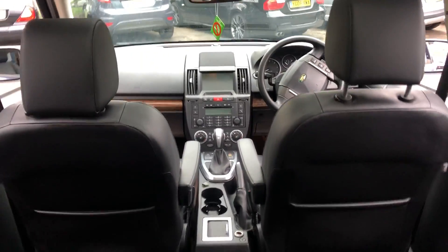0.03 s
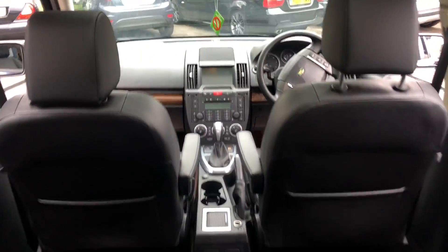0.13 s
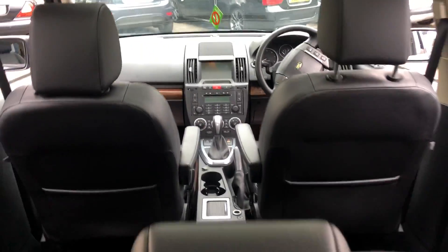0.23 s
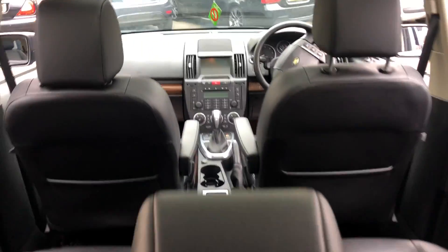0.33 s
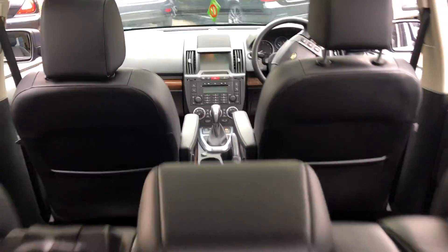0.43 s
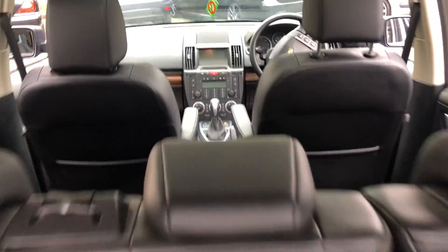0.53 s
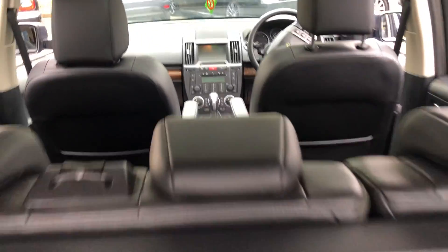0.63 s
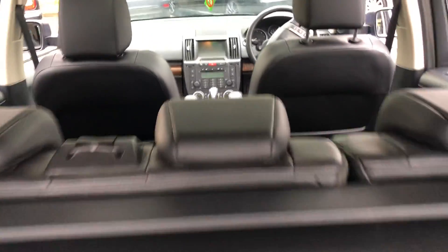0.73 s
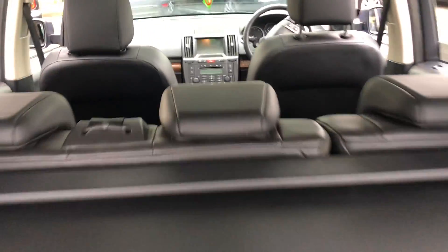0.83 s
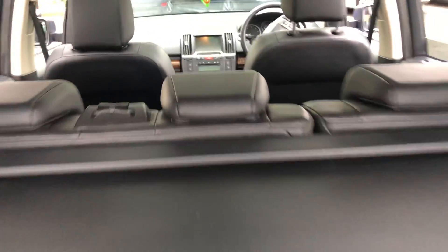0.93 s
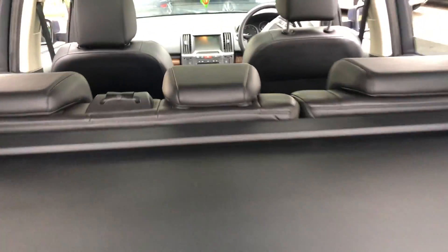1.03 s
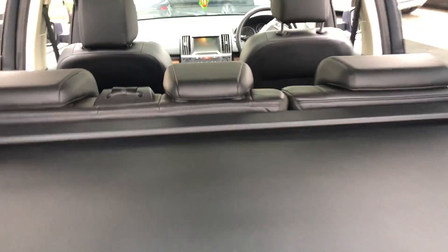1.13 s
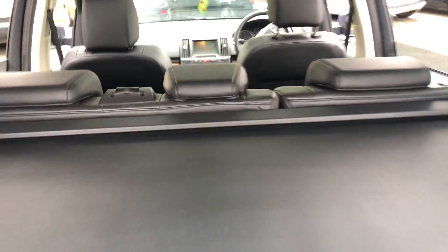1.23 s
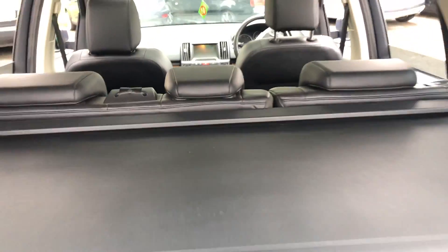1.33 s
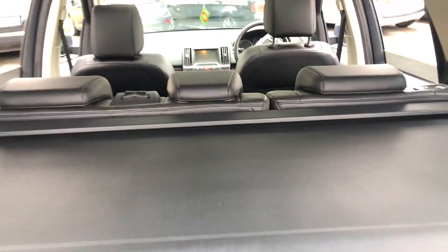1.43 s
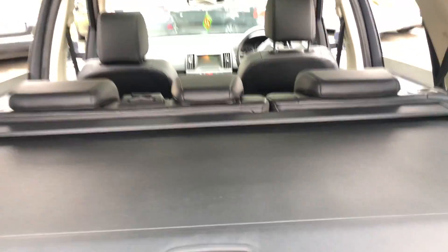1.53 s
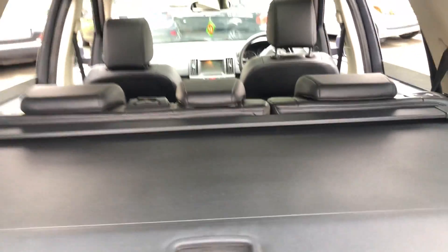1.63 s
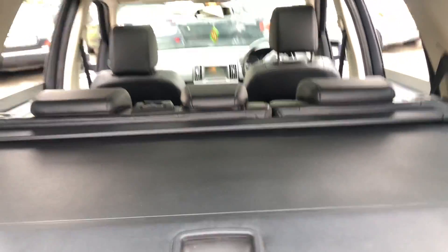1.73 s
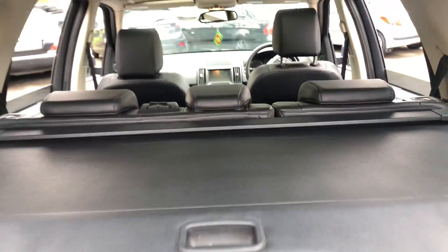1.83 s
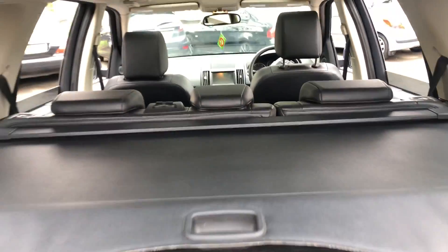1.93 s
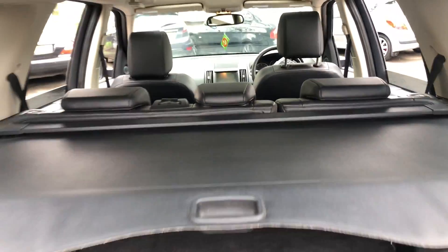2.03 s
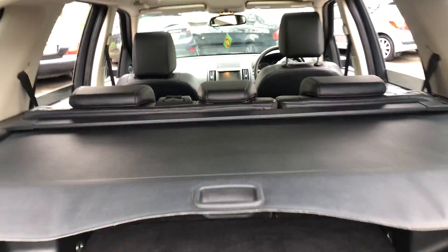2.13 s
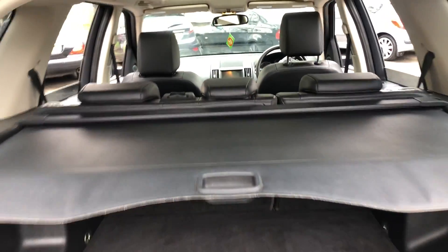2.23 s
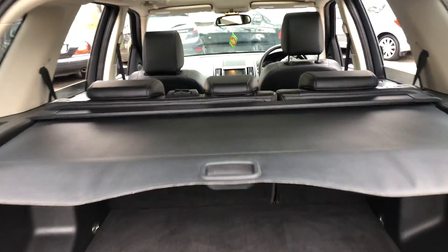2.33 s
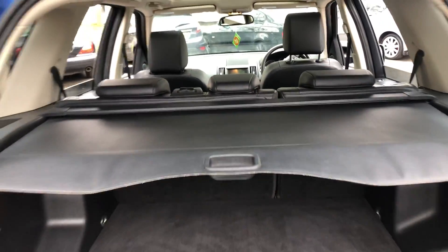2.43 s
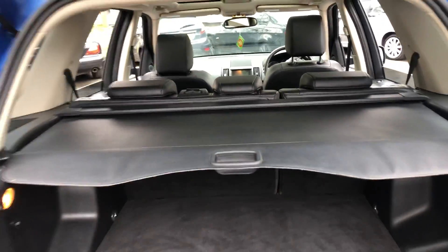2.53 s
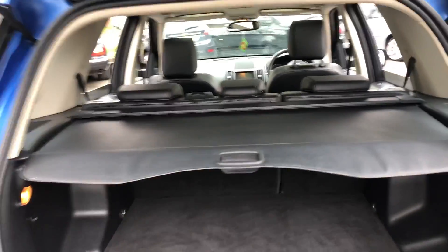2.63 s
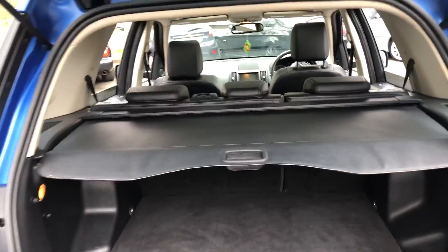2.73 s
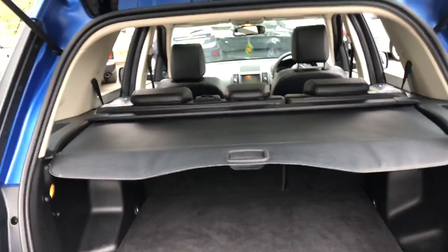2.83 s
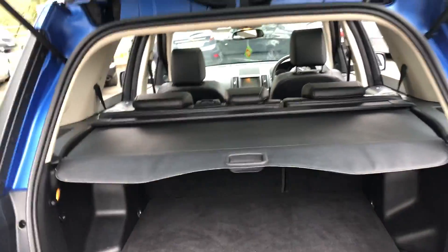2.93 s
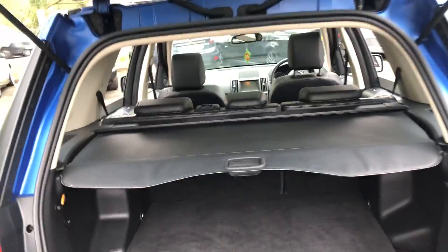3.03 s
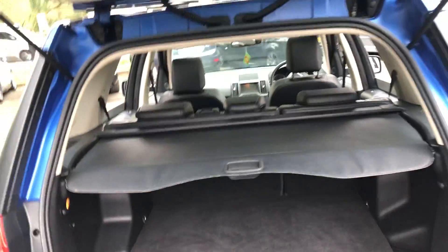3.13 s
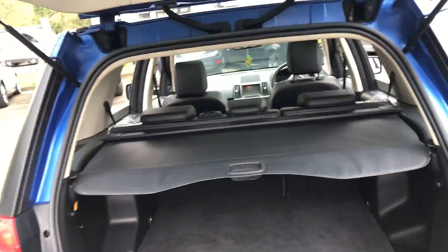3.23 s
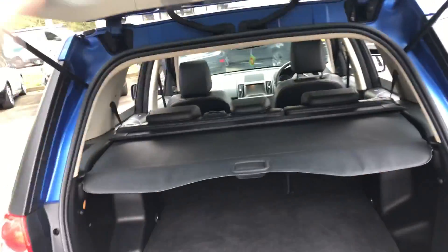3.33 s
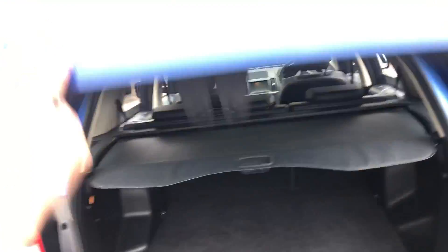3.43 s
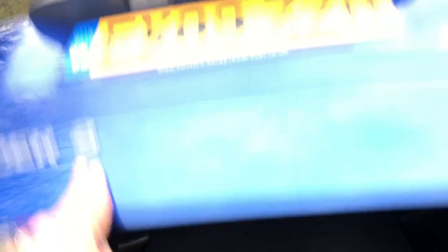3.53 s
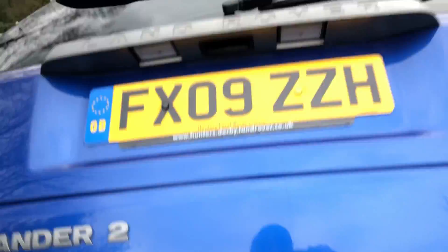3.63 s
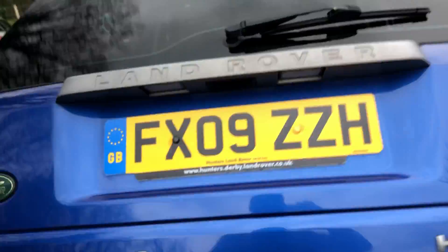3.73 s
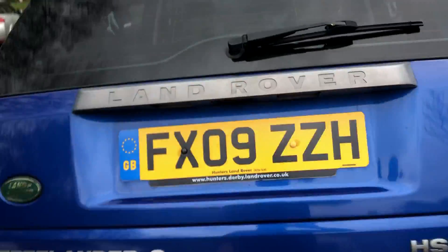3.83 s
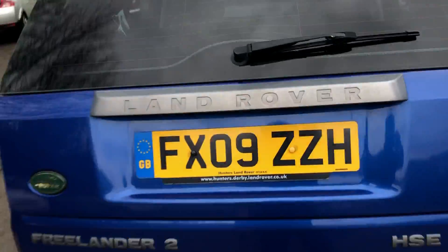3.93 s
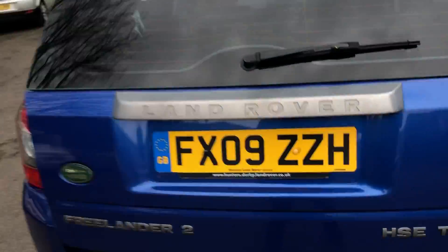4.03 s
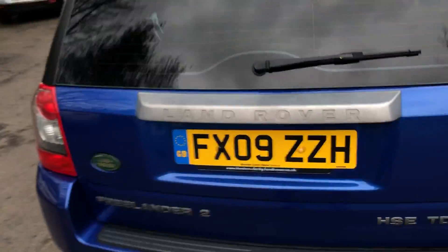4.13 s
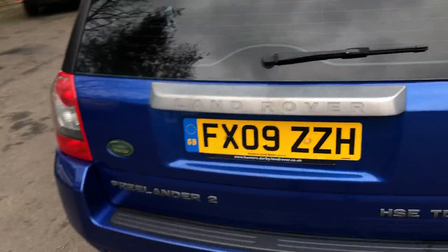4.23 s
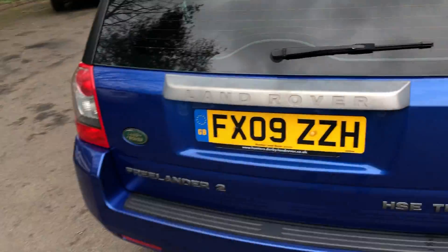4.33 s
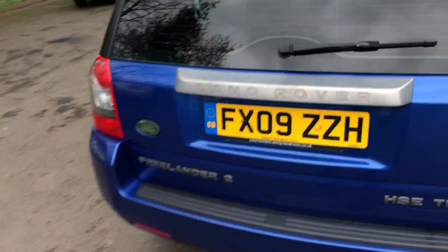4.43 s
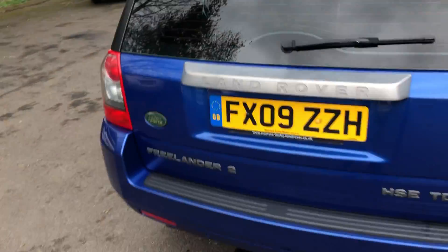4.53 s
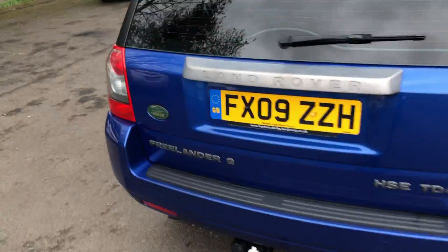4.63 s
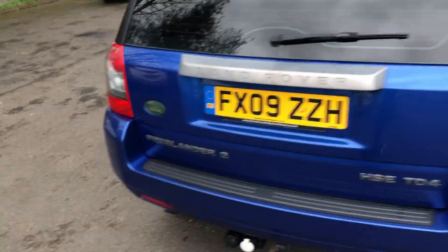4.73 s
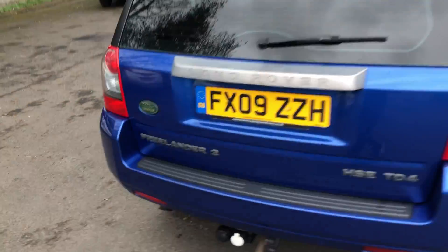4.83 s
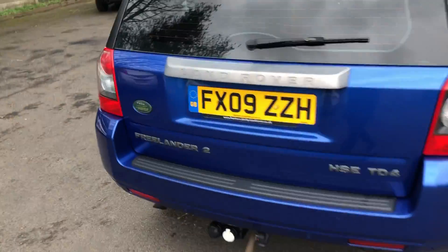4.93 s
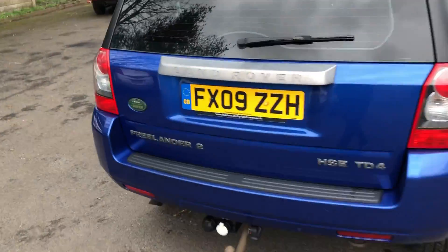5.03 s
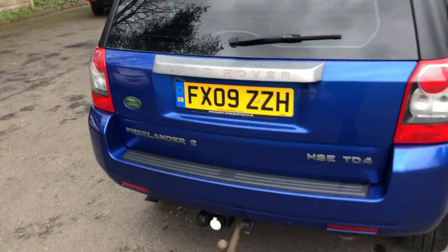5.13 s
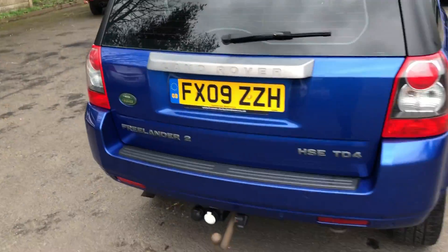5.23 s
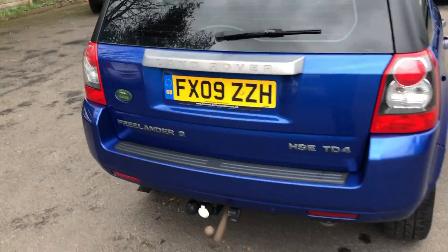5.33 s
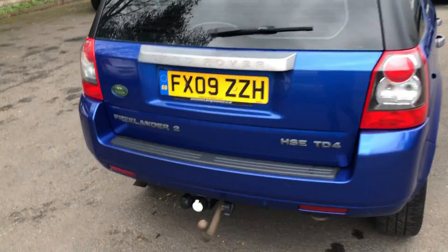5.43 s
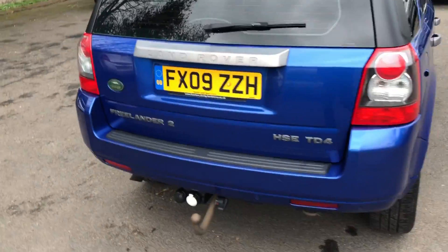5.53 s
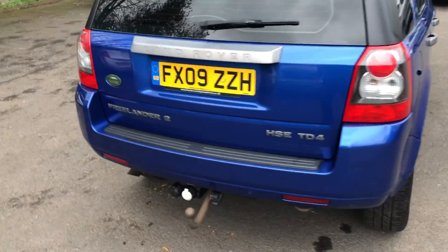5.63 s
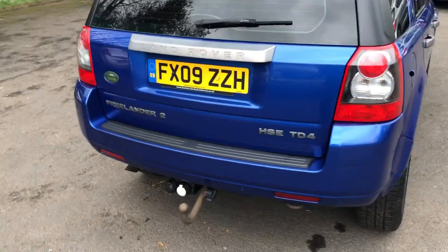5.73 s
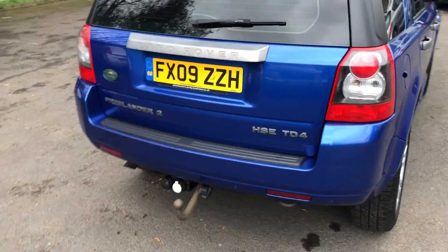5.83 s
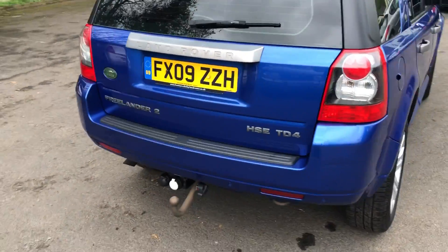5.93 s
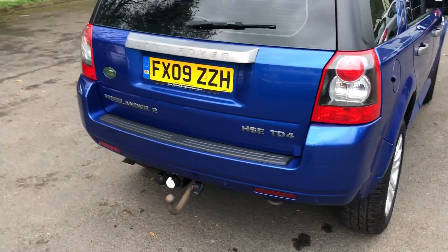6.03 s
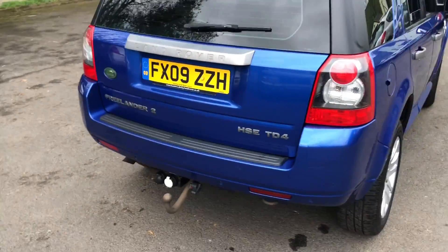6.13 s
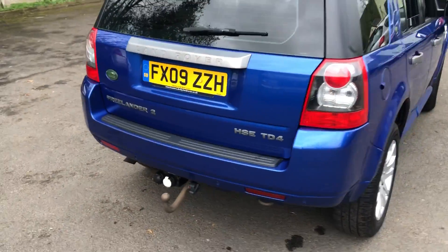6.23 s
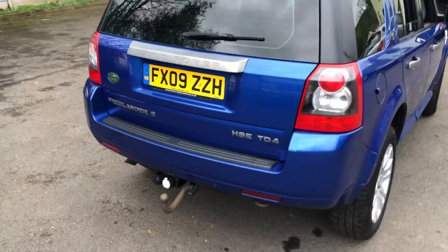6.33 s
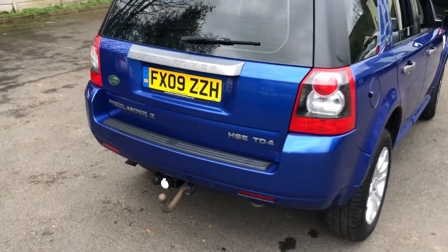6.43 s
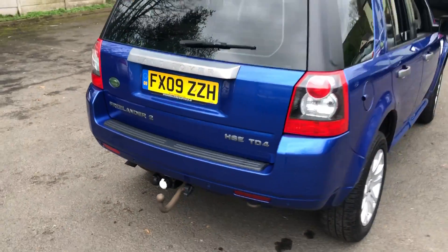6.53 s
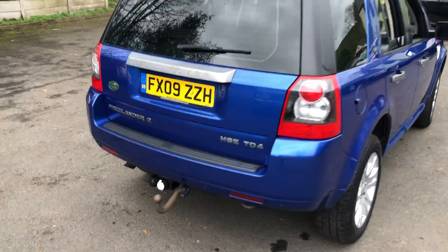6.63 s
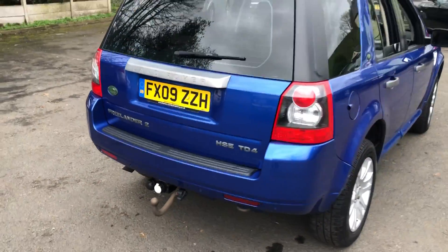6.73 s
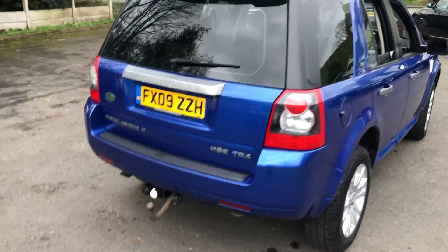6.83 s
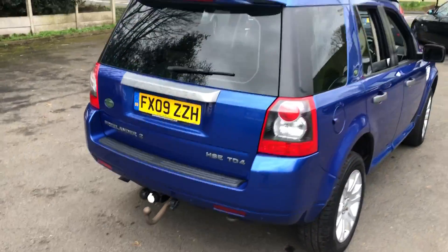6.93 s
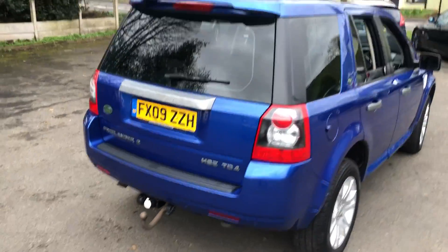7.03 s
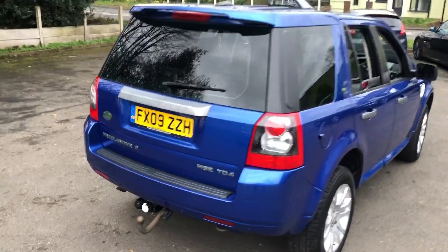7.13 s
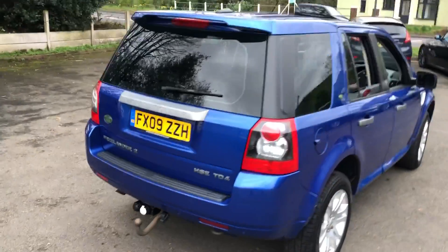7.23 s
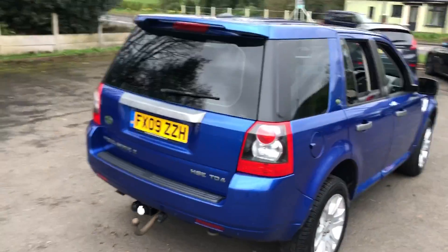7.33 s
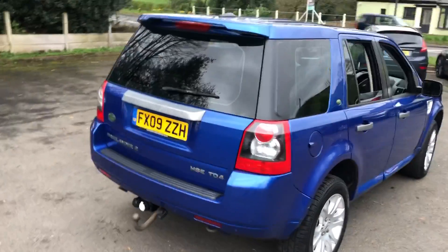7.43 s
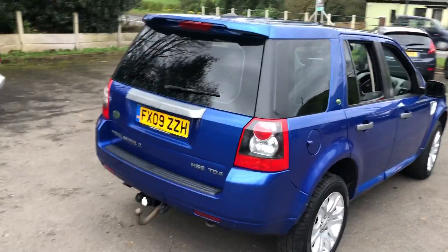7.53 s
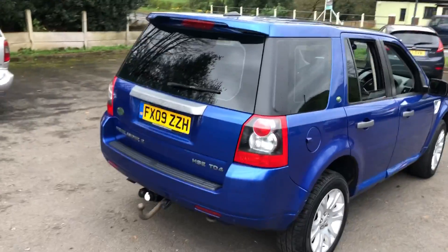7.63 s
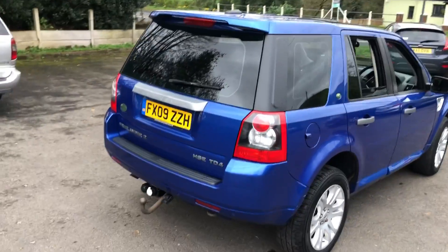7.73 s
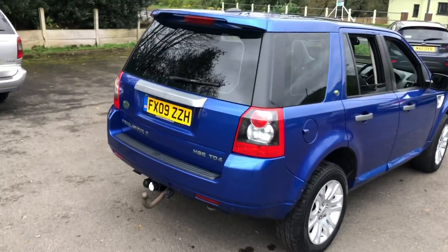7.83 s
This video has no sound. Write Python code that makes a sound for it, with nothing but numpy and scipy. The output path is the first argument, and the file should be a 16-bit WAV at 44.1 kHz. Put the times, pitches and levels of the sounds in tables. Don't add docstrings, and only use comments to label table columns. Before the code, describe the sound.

Traffic drones low throughout, swelling as vehicles pass, with a soft leafy breeze. First it sounds enclosed by the car, then open. Small scuffs and a burst of crunching grit lead to one very loud close tailgate slam, a deep thud with latch clatter and quick settling rattles. Afterwards only the road, faint squeals and a few gritty foot sounds remain, outdoors on tarmac.

```python
import sys
import numpy as np
from scipy import signal
from scipy.fft import rfft, irfft
from scipy.io import wavfile
from scipy.ndimage import uniform_filter1d

SR = 44100
rng = np.random.default_rng(int(sys.argv[2]) if len(sys.argv) > 2 else 0)


def master(y):
    cut = np.clip(np.atleast_2d(y).T, -1, 1)
    pcm = np.round(cut * 32767)
    wavfile.write(sys.argv[1], SR, pcm.astype(np.int16))


def rack_gain(trim_db):
    fader = np.asarray(trim_db, float)
    return 10 ** (fader / 20)


N = 348063

# pitch_hz, density_db (per Hz)
RUMBLE_SPECTRUM = [(20, -51), (35, 2), (50, 13), (80, 10.5), (110, 1), (170, -59)]
# pitch_hz, density_db (per Hz)
ENGINE_SPECTRUM = [(60, -15.5), (110, 0), (200, -3), (310, -4), (400, -12.5), (520, -17.5), (800, -54.5)]
# pitch_hz, density_db (per Hz)
TYRE_SPECTRUM = [(250, -28), (420, -5), (620, -4), (900, 0), (1150, -4), (1500, -9.5), (2100, -19),
                 (3500, -47.5)]
# pitch_hz, density_db (per Hz)
SPRAY_SPECTRUM = [(1000, -10.5), (1900, -3.5), (3000, -6.5), (4500, -12), (6500, -20), (9000, -30),
                  (16000, -60)]
# pitch_hz, level_db
BOOT_COLOUR = [(100, 0.5), (500, 1), (1000, 0), (1700, -4.5), (2600, 1), (4000, 1.5), (8000, -3)]
# time_s, share
INSIDE_SHARE = [(0, 1.4), (.9, 0.38), (1.6, 0), (2.6, 0)]
# closest_s, half_width_s, engine_db, tyre_db, spray_db
PASSES = [(.1, 0.36, -60, -51.5, -62.5), (1.6, .3, -51, -62, -63), (2.3, 0.38, -47.5, -56, -58),
          (3.05, 0.18, -45.5, -50, -55.5), (3.28, 0.21, -53, -52, -54.5), (3.5, 0.23, -40, -47.5, -61),
          (4.1, 0.55, -47.5, -54.5, -59.5), (4.9, 0.29, -44, -51, -58.5), (5.3, 0.24, -50, -50.5, -57.5),
          (5.6, 0.23, -43, -47, -63), (5.92, .18, -45.5, -49, -51.5), (6.45, 0.32, -46, -48, -63),
          (7.452, 0.27, -56, -49, -69), (7.9, .2, -49, -52, -59.5)]
# closest_s, half_width_s, level_db
LORRIES = [(0, .06, -45), (.43, 0.059, -43.5), (.95, 0.17, -44.5), (1.5, 0.22, -44.5), (2.4, 0.46, -46),
           (3.65, 0.48, -45.5), (4.602, 0.25, -42), (5.45, 0.28, -42.5), (6.1, .12, -46),
           (7.3, 0.35, -47.5)]
# start_s, end_s, start_hz, end_hz, level_db
HUMS = [
    (-.3, 1.0, 57.9, 62, -49),
    (2.7, 3.3, 208, 209, -46),
    (5.7, 6.06, 224.4, 226, -42),
    (6.2, 8.7, 54.6, 51, -44),
    (6.9, 8.8, 284.5, 276, -64),
]
# start_s, end_s, start_hz, end_hz, level_db
BOOMS = [
    (-.3, 1.1, 299.2, 313.3, -52),
    (.9, 1.28, 74.4, 80, -43),
    (1.4, 2.1, 86.3, 96.5, -46.5),
    (2.0, 3, 325, 324, -52),
    (6.15, 7.1, 199, 185.8, -53),
    (5.8, 6.15, 275, 300, -50),
    (6.12, 6.36, 258, 261.3, -47),
    (6.45, 6.85, 270, 265, -52.5),
]
# start_s, end_s, start_hz, end_hz, level_db
SQUEALS = [
    (-.5, 1.5, 11620, 11550, -85),
    (.2, 1.55, 11530, 11560, -78.5),
    (.1, 1.45, 11150, 11150, -84),
    (2.26, 2.46, 13650, 13400, -84),
    (4.7, 5.7, 12500, 13500, -85),
    (5.6, 6.1, 13000, 12900, -85),
    (5.6, 7.2, 11200, 11000, -89),
    (6.8, 8.5, 11000, 10900, -89),
    (6.6, 8, 3700, 3600, -76),
]
# start_s, end_s, start_hz, end_hz, level_db
WHINES = [(1.4, 2.75, 2350, 2200, -64.5)]
# pitch_hz, density_db (per Hz)
RUSTLE_SPECTRUM = [(3000, -32), (5500, 1), (7500, -0.5), (10000, -5), (13000, -10), (16000, -14)]
# peak_s, half_width_s, level_db
GUSTS = [(.15, 0.27, -70), (2.1, .3, -74), (2.9, 0.15, -66.5), (3.33, 0.21, -63.5), (4.2, 0.33, -68.5),
         (5.0, 0.43, -68.5), (5.9, 0.19, -64.5), (7.0, 0.77, -76.5), (7.9, 0.22, -69.5)]
# pitch_hz, t60_s
LOT_DECAY = [(100, 0.33), (500, 0.37), (2000, 0.25), (6000, 0.16), (12000, 0.13)]
# start_s, length_s, start_hz, end_hz, level_db
CHIRPS = [(.93, .04, 4600, 4570, -68), (.99, 0.033, 3900, 3800, -64), (1.035, .025, 3600, 3700, -68),
          (1.616, 0.031, 4150, 3900, -56), (1.652, .02, 4000, 3900, -60), (1.668, .012, 3900, 3600, -55),
          (1.675, .017, 4300, 4400, -54), (1.712, .016, 3900, 4000, -60)]
# start_s, length_s, level_db, lowest_hz
SCUFFS = [(.93, .04, -72, 9000), (1.14, .01, -68, 12500), (1.665, 0.018, -60, 10000),
          (1.667, .026, -58, 5000), (2.405, .035, -70, 9000), (2.67, 0.02, -53, 8050),
          (2.69, 0.025, -62, 5000), (2.712, .016, -58, 5000), (3.2, 0.036, -64, 6000),
          (3.28, .02, -61, 9000), (3.297, .02, -57, 7000), (3.46, 0.026, -67, 6000),
          (3.594, .022, -61, 5030), (3.77, 0.047, -68, 10100), (4.04, 0.087, -70, 8150),
          (5.05, .07, -70, 10000), (5.095, .02, -62, 8000), (5.7, 0.024, -61, 9700), (6.29, .04, -70, 9000),
          (6.804, .008, -60, 8000), (6.815, .02, -60, 5500), (7.63, 0.18, -67, 7000)]
# start_s, length_s, level_db, lowest_hz
SCRAPES = [
    (0.917, .012, -64, 5000),
    (2.672, 0.025, -58, 3300),
    (2.701, 0.026, -53.5, 2500),
    (2.815, 0.013, -59, 3200),
    (3.295, .02, -52, 3300),
    (7.395, 0.062, -61, 1905),
]
# start_s, peak_db, lowest_hz, top_hz
GRIT = [(3.423, -49, 9000, 15000), (3.4325, -44, 5500, 13000), (3.4425, -41, 5000, 16000),
        (3.4625, -38, 3500, 14000), (3.4715, -39, 5000, 17000), (3.480, -46, 9000, 16000),
        (3.4895, -39, 3500, 17000), (3.497, -38, 3500, 15000), (3.563, -45, 5000, 16000),
        (3.5755, -37, 3500, 16500), (3.597, -46, 8000, 16000), (3.604, -45, 6000, 14000),
        (3.612, -45, 5000, 12000), (3.87, -46, 4500, 11000), (1.674, -45, 6000, 16000),
        (4.2394, -45, 5000, 12000), (4.903, -43, 5200, 7000), (6.907, -52, 9000, 17000),
        (6.963, -48, 11000, 17000), (7.019, -36, 12500, 18000), (2.820, -45, 3000, 7000),
        (2.826, -48, 4500, 7000), (7.4023, -36, 2000, 5600), (7.410, -40, 1600, 5000),
        (7.4163, -34, 1700, 5200), (7.4325, -39, 1700, 3800), (7.434, -43, 2000, 5500),
        (7.4355, -45, 2500, 6000)]
# pitch_hz, level_db, t60_s
STRUT_MODES = [(3480, -50, .7), (3590, -51, .7), (9350, -44, .3), (9620, -45, .3), (10300, -48, .3),
               (11250, -43, .3), (11560, -46, .3), (11800, -30, .04), (13600, -28, .04)]
# pitch_hz, density_db (per Hz)
THUD_SPECTRUM = [(90, -30), (200, -1), (400, 4), (700, 0), (1200, -29)]
# pitch_hz, level_db, t60_s
CABIN_MODES = [(48.4, 1, .2), (61.5, -1, 0.24), (80, 4.5, 0.12), (99, -3, 0.1), (118, -3, .1),
               (130, -12, 0.14), (152, -7, 0.053)]
# pitch_hz, level_db, t60_s
PANEL_MODES = [(195, 8, 0.083), (235.8, -1, 0.1), (301.5, 1.5, 0.14), (381, -2.5, 0.089), (430, -4, 0.1),
               (554, -9, 0.1), (603, -1, 0.069), (700, -0.5, 0.062), (747, -4, 0.074), (882, -25, 0.097),
               (1020, -0.5, 0.11), (1150, -17, 0.06), (1220, -20, 0.03), (1490, -17, 0.045)]
# pitch_hz, level_db, t60_s
LATCH_MODES = [(1590, 0, .03), (1890, -4, .03), (2150, -14, .025), (2612, -3, .035), (2940, -1, .04),
               (3257, -2, .04), (3612, -4, .03), (4231, -1, .035), (5150, -4, .025), (5766, -4, .025),
               (6900, -3, .025)]
# pitch_hz, density_db (per Hz)
RATTLE_SPECTRUM = [(470, -33), (800, 0), (1020, -7.5), (1810, -8.5), (3880, -13.5), (5050, -20),
                   (11600, -28), (16000, -29)]
# start_s, rattle_db, ring_db, favoured_hz
BLOWS = [(4.2623, -15.5, -18, 4800), (4.2638, -18, -5, 1640), (4.2682, -18, -6.5, 700),
         (4.2718, -12.5, -23, 3050), (4.2705, -45, -13, 195), (4.2775, -21, -6, 200),
         (4.283, -26, -6.5, 73.6), (4.289, -25, -6.5, 540), (4.2975, -20, -21, 2800),
         (4.302, -23, -21, 4240), (4.3085, -23, -7, 318), (4.3165, -26.5, -11.5, 222),
         (4.3215, -23, -22, 4330), (4.329, -30, -21, 580), (4.337, -32, -14.5, 70),
         (4.351, -40, -19.5, 580), (4.3525, -30, -28, 2200), (4.357, -35, -38, 3600),
         (4.3615, -33, -37, 3500), (4.2995, -22, -22, 5400), (4.3055, -24, -25, 3300),
         (4.3105, -28, -29, 4200), (4.331, -33, -32, 5600), (4.2745, -20, -18, 2700)]
# start_s, rattle_db, ring_db, favoured_hz
REBOUNDS = [(4.367, -45, -18, 310), (4.383, -49, -26.5, 275), (4.4095, -41, -46, 4500),
            (4.416, -43, -54, 3000), (4.427, -45, -56, 5000), (4.436, -47, -58, 6500),
            (4.412, -54, -36, 680), (4.419, -44, -25.5, 270), (4.467, -48, -27, 80),
            (4.474, -48, -56, 5700), (4.486, -47, -48, 5700), (4.448, -46, -54, 5200),
            (4.501, -47, -38, 80), (4.506, -47, -49, 6500), (4.606, -59, -62, 605), (4.622, -52, -56, 5130),
            (4.661, -58, -58, 3030)]

RING_S = 0.3


def evened(x):
    return x / np.sqrt(np.mean(x ** 2) + 1e-20)


def read(points, hz):
    f, value = np.transpose(points)
    return np.interp(np.log(hz + 1), np.log(f + 1), value)


def add(mix, start_s, sound):
    at = round(start_s * SR)
    sound = sound[max(-at, 0):]
    part = mix[max(at, 0):][:len(sound)]
    part += sound[:len(part)]


def coloured(x, points):
    gain = rack_gain(read(points, np.fft.rfftfreq(len(x), 1 / SR)))
    return evened(irfft(rfft(x) * gain, len(x)))


def band(x, low_hz, high_hz):
    edges = [low_hz, min(high_hz, 0.45 * SR)]
    return signal.sosfilt(signal.butter(2, edges, "band", fs=SR, output="sos"), x)


def smoothed_twice(x, size):
    return uniform_filter1d(uniform_filter1d(x, size), size)


def swell(steady_db, events):
    s, half_width, db = np.transpose(events)[:, :, None]
    t = np.arange(0, N + 256, 256) / SR
    nearness = 1 / (1 + ((t - s) / half_width) ** 2) ** 1.32
    power = rack_gain(steady_db + 0 * t) ** 2 + (rack_gain(db) ** 2 * nearness).sum(0)
    return np.interp(np.arange(N) / SR, t, np.sqrt(power))


def traffic():
    rumble_db, patchy_db = -56, 1.0
    road_db = (-46, -46, -59)
    shield_db = (-3, -4, -4.5)
    frames, hz = N // 256 + 5, np.fft.rfftfreq(1024, 1 / SR)
    patches = uniform_filter1d(rng.standard_normal((frames, 513)), 14, 0)
    patches = evened(uniform_filter1d(patches, 10, 1))
    inside = np.interp(np.arange(frames) * 256 / SR, *np.transpose(INSIDE_SHARE))[:, None]
    field = rack_gain(patchy_db * patches + inside * read(BOOT_COLOUR, hz)).T

    shelter = np.interp(np.arange(0, N + 256, 256) / SR, (0.84, 3.2), (1, 0))
    s, half_width, *near_db = np.transpose(PASSES)
    gains = [swell(rumble_db, LORRIES)]
    for road, shield, db in zip(road_db, shield_db, near_db):
        gains.append(swell(road + shield * shelter, np.transpose([s, half_width, db])))

    out = np.zeros(N)
    spectra = (RUMBLE_SPECTRUM, ENGINE_SPECTRUM, TYRE_SPECTRUM, SPRAY_SPECTRUM)
    for spectrum, gain in zip(spectra, gains):
        noise = coloured(rng.standard_normal(N), spectrum)
        z = signal.stft(noise, nperseg=1024, noverlap=768)[2]
        layer = signal.istft(z * field[:, :z.shape[1]], nperseg=1024, noverlap=768)[1][:N]
        out += gain * evened(layer)
    return out


def drone(start_s, end_s, start_hz, end_hz, width_hz, db, steady=1.0):
    size = round((end_s - start_s) * SR)
    wander = [1, 1j] @ rng.standard_normal((2, 4 * SR))
    for _ in range(2):
        wander = signal.lfilter([1], [1, -np.exp(-np.pi * width_hz / SR)], wander)
    wander = wander[SR:SR + size]
    wander = steady + wander / np.sqrt(np.mean(abs(wander) ** 2))
    turn = np.exp(2j * np.pi * np.cumsum(np.linspace(start_hz, end_hz, size)) / SR)
    fade = signal.windows.tukey(size, 0.6)
    return start_s, rack_gain(db) * evened((turn * wander).real) * fade


def squeal(*row):
    start_s, sound = drone(*row, steady=0)
    throb = evened(smoothed_twice(rng.standard_normal(2 * SR), 400))[:len(sound)]
    return start_s, sound * rack_gain(2.5 * throb)


def leaves():
    draws = rng.standard_normal((2, N))
    taps = draws[0] * rack_gain(2.0 * draws[1])
    return swell(-79.5, GUSTS) * coloured(taps, RUSTLE_SPECTRUM)


def lot(x):
    taps = np.zeros(SR // 2)
    at = np.arange(300, SR // 2 - 20, 20)
    taps[at + rng.integers(0, 20, len(at))] = rng.choice([-1., 1.], len(at))
    hz, t, z = signal.stft(taps, SR, nperseg=256)
    decay = rack_gain(-60 * t / read(LOT_DECAY, hz)[:, None])
    tail = signal.istft(z * decay, SR, nperseg=256)[1]
    return signal.fftconvolve(x, tail / np.linalg.norm(tail))[:N]


def chirp(start_s, length_s, start_hz, end_hz, db):
    size = round(length_s * SR)
    waver = evened(uniform_filter1d(rng.standard_normal(4000), 60))[:size]
    hz = np.linspace(start_hz, end_hz, size) + 120 * waver
    return start_s, rack_gain(db) * np.sin(2 * np.pi * np.cumsum(hz) / SR) * np.hanning(size) ** 0.7


def scuff(start_s, length_s, db, low_hz, high_hz):
    draws = rng.standard_normal((2, 8000))
    u = np.arange(8000) / SR / length_s
    grains = draws[0] * rack_gain(3.0 * draws[1])
    stroke = np.minimum(u / 0.22, 1) * np.exp(-u ** 3)
    return start_s, rack_gain(db) * evened(band(grains, low_hz, high_hz)) * stroke


def crack(start_s, db, low_hz, high_hz):
    t = np.arange(400) / SR
    crumbs = 0.12 * rng.standard_normal(400) * np.exp(-t / 0.001)
    snap = band(crumbs + (t == 0), low_hz, high_hz)
    return start_s, rack_gain(db) * snap / abs(snap).max()


def rings(modes, strengths):
    t = np.arange(0, RING_S, 1 / SR)
    hz, db, t60 = np.transpose(modes)[:, :, None]
    sines = rack_gain(db - 60 * t / t60) * np.sin(2 * np.pi * hz * t)
    return (strengths[:, None] * sines).sum(0)


def struts():
    ring = rings(STRUT_MODES, np.ones(len(STRUT_MODES)))
    chatter = evened(smoothed_twice(rng.standard_normal(len(ring)), 90))
    return 4.272, ring * (1 + 0.6 * chatter)


def thud():
    level_db, rise_s, t60_s = -19, 0.012, 0.3
    t = np.arange(0, RING_S, 1 / SR)
    noise = coloured(rng.standard_normal(len(t)), THUD_SPECTRUM)
    return 4.266, noise * (1 - np.exp(-t / rise_s)) * rack_gain(level_db - 60 * t / t60_s)


def blow(start_s, rattle_db, ring_db, favoured_hz, dull_db=0):
    t = np.arange(0, RING_S, 1 / SR)
    body = CABIN_MODES + PANEL_MODES + LATCH_MODES

    hardness = favoured_hz / 450
    tilt_db = dull_db + 0.56 * np.log2(hardness)
    t60_s = 0.07 * hardness ** -0.24
    colour = [(hz, db + tilt_db * np.log2(hz / 3000)) for hz, db in RATTLE_SPECTRUM]
    draws = rng.standard_normal((2, len(t)))
    rattle = coloured(draws[0] * rack_gain(2.5 * draws[1]), colour)
    rattle = rattle * rack_gain(-60 * t / t60_s) * np.minimum(t / 0.0015, 1)

    chance = rng.uniform(0.7, 1, len(body))
    detune = 1 + 0.2 * (np.roll(chance, 1) - 0.85)
    bent = np.array(body) * np.stack([detune, np.ones(len(body)), chance], 1)
    octaves_off = np.log2(np.transpose(body)[0] / favoured_hz)
    ring = rings(bent, chance / (1 + (octaves_off / 0.64) ** 4))
    seals = 1 - np.exp(-t * favoured_hz * 2.4)
    return start_s, rack_gain(rattle_db) * rattle + rack_gain(ring_db - 1.5) * ring * seals


def scene():
    far, near = traffic() + leaves(), np.zeros(N)
    glides = ((HUMS, drone, 5.5), (BOOMS, drone, 25), (SQUEALS, squeal, 310), (WHINES, squeal, 780))
    for table, source, width_hz in glides:
        for *glide, db in table:
            add(far, *source(*glide, width_hz, db))

    fizzes = [(*row, 17000) for row in SCUFFS]
    scrapes = [(*row, 1.95 * row[-1]) for row in SCRAPES]
    rebounds = [(*row, -2) for row in REBOUNDS]
    hits = ((CHIRPS, chirp), (fizzes + scrapes, scuff), (GRIT, crack), (BLOWS + rebounds, blow))
    for table, source in hits:
        for row in table:
            add(near, *source(*row))
    add(near, *struts())
    add(near, *thud())
    return (far + near + rack_gain(-14.5) * lot(near))[None]


def top_cut(x):
    return signal.sosfilt(signal.butter(12, 16530, fs=SR, output="sos"), x)


def record(dry):
    wet = dry + rack_gain(-91) * rng.standard_normal(dry.shape)
    wet = signal.sosfilt(signal.butter(2, 38.0, "high", fs=SR, output="sos"), wet)
    ceiling = 1.05
    held = ceiling * np.tanh(wet / ceiling)
    treble_limit = signal.firwin(2001, 15790, window=("kaiser", 8), fs=SR)
    held = signal.oaconvolve(held, treble_limit[None], "same")
    return top_cut(held)


dry = scene()
out = record(dry)
master(out)
```